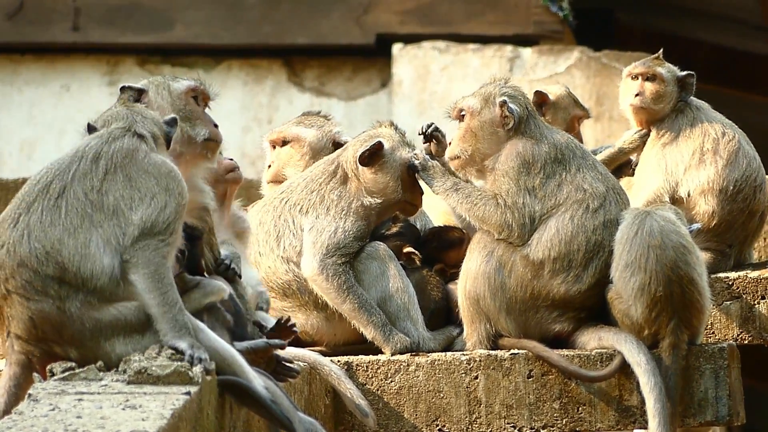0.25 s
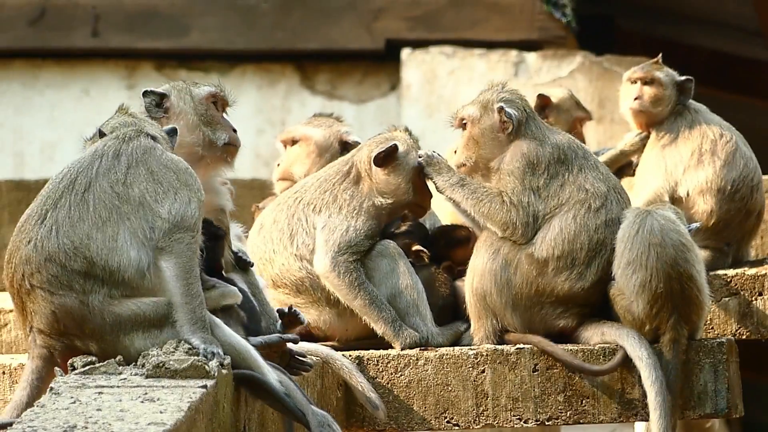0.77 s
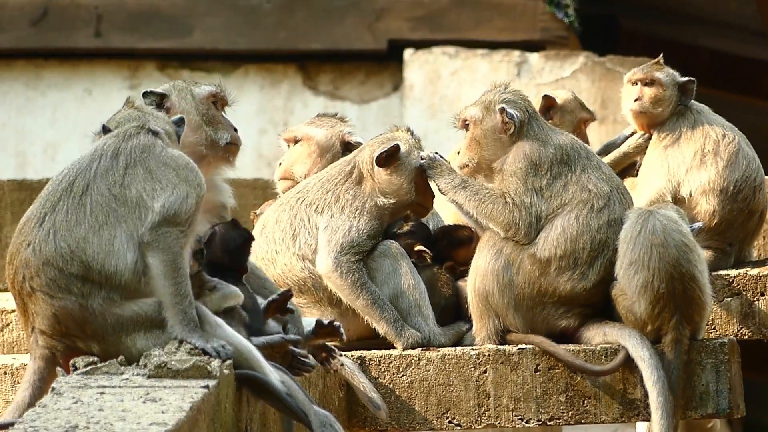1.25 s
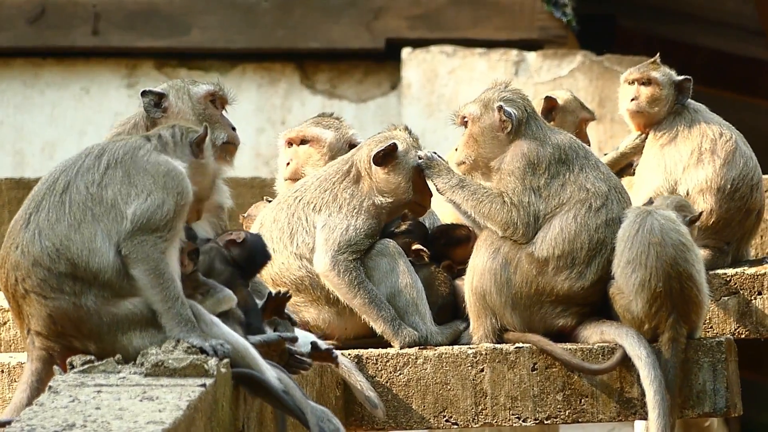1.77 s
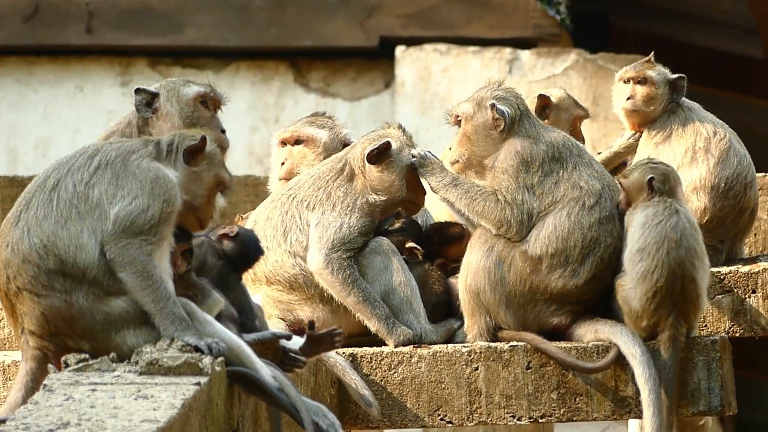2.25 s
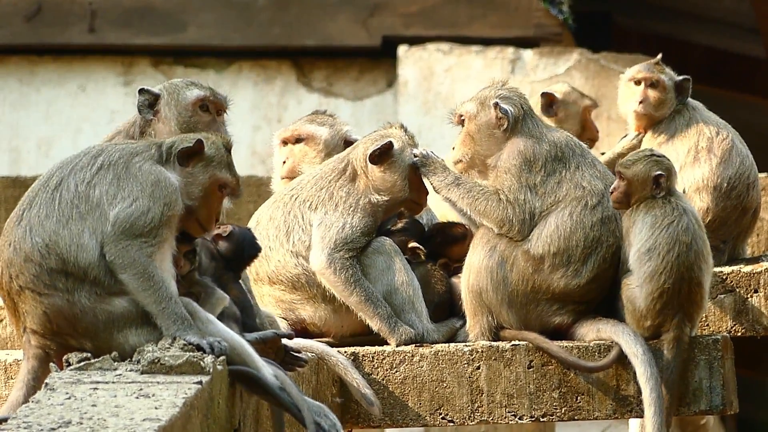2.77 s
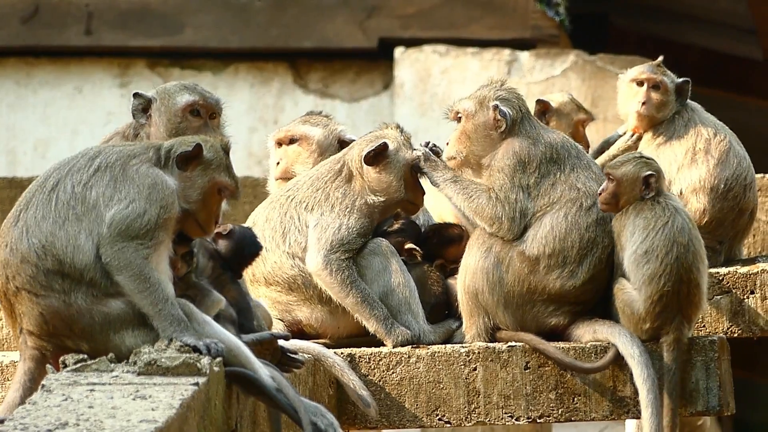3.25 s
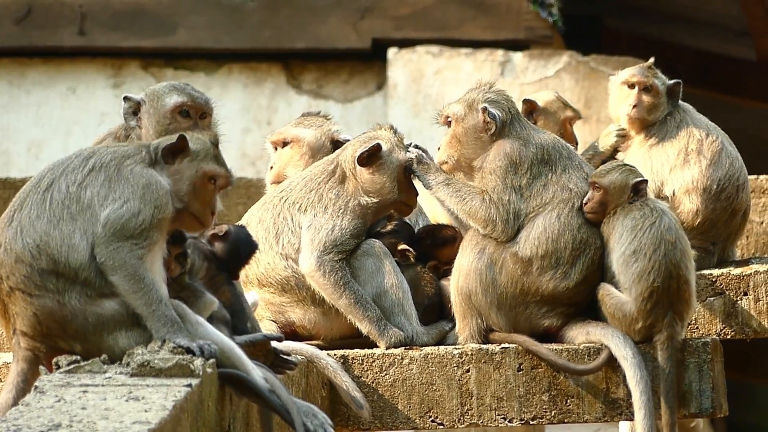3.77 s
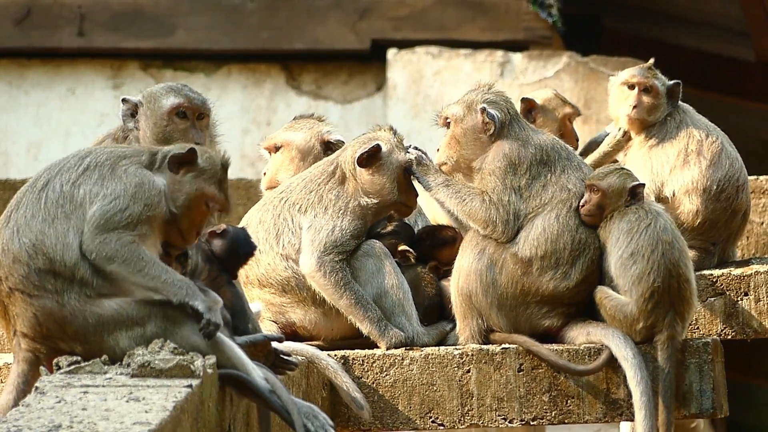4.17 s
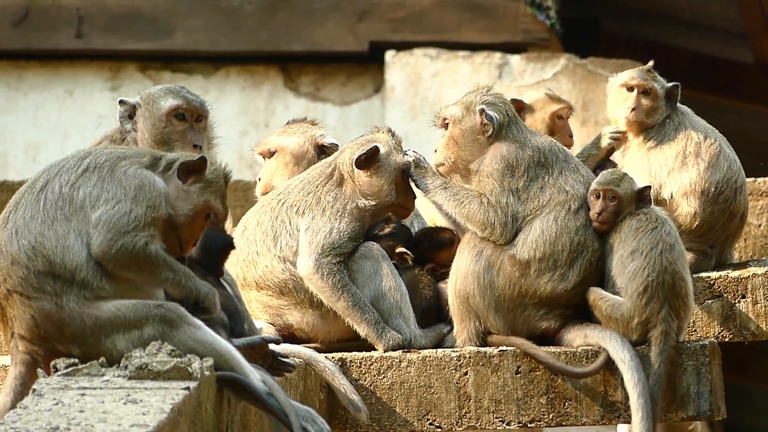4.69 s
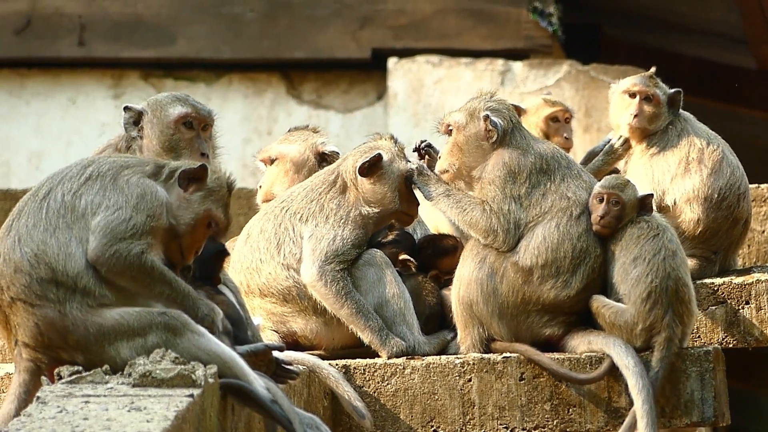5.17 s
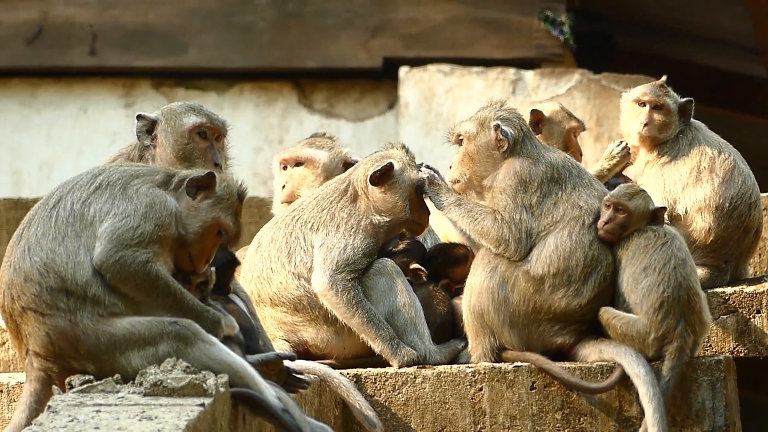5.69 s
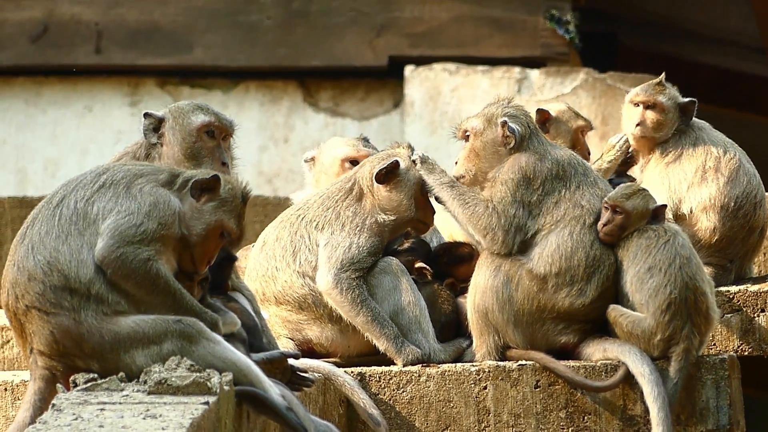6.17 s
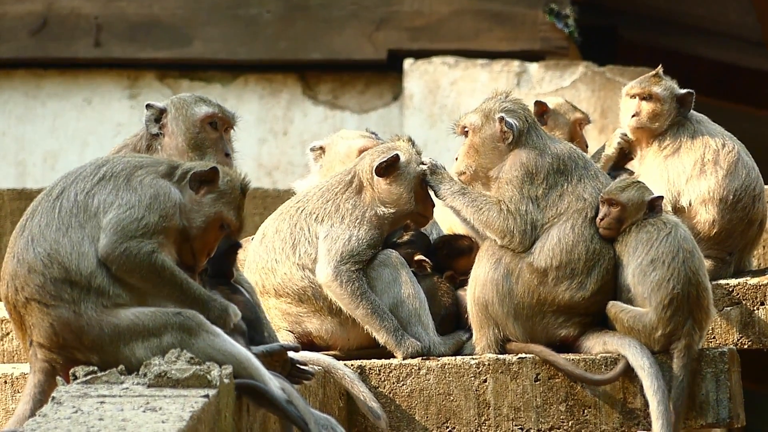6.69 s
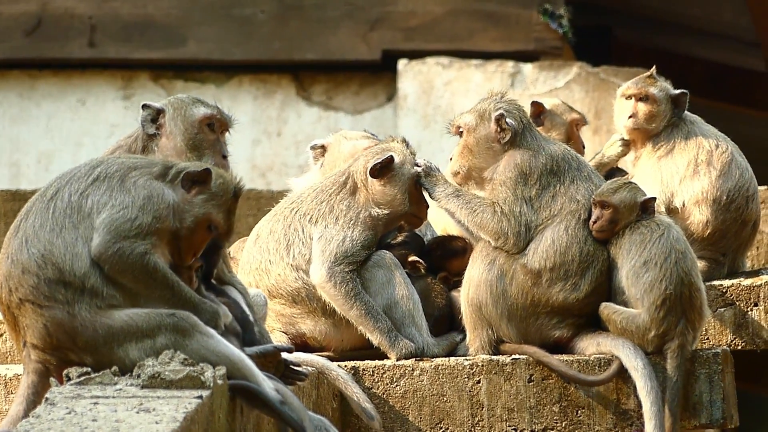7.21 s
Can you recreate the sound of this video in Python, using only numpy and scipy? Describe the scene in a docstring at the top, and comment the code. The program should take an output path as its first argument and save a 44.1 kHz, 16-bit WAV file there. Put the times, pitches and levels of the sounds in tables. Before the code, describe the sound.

Unbroken shrill insect chorus with leafy hiss and a faint high cricket throb; tiny dull knocks, a short rustle and barely audible far bird hoots.

```python
"""A dense cicada drone outdoors, with leaf hiss, low distant rumble and a bush cricket throbbing in the far treble.
Soft taps, a short rustle and faint hoots of a far bird pass under it; early on the level dips briefly.
Cicadas are random clicks ringing body resonances; hiss, rumble, cricket and rustle are shaped noise,
the last two under soft swells; taps are decaying sines, hoots are sines gliding in pitch."""
import sys
import numpy as np
from scipy import signal
from scipy.fft import rfft, irfft, next_fast_len
from scipy.io import wavfile
from scipy.ndimage import uniform_filter1d

SR = 44100
rng = np.random.default_rng(int(sys.argv[2]) if len(sys.argv) > 2 else 0)


def to_wav(s):
    """Save 16-bit WAV."""
    ch = np.atleast_2d(s).T  # columns
    pcm = np.round(np.clip(ch, -1, 1) * 32767)  # PCM
    wavfile.write(sys.argv[1], SR, pcm.astype(np.int16))


N = 328525  # samples

# Cicada body resonances. Each row: centre in Hz, width in Hz (6 dB down), relative level in dB,
# left-right likeness 0-1, left minus right in dB.
BODY_RESONANCES = [(1783, 370, -9, 0.74, -1.7), (3482, 592, -0.5, .9, -1.5), (3150, 264, -7.5, 0.77, -2),
                   (3830, 360, -7.5, 0.72, 0), (4276, 510, -11, 0.9, -3), (5100, 900, -9.5, 0.85, -1.2),
                   (5670, 1270, -13.5, 0.92, -1), (6680, 1380, -15.5, 0.91, -0.3)]
# Hiss of leaves and far insects. Each row: frequency in Hz, relative density in dB per Hz.
HISS_COLOUR = [(900, -29.5), (1400, -4), (2500, -3.5), (7800, -1.5), (10000, -1.5), (12000, -4),
               (14000, -10.5), (15700, -22)]
# Hiss, left against right. Each row: frequency in Hz, likeness 0-1.
HISS_LIKENESS = [(1500, 0), (7000, 0.66), (10000, 0.68), (13500, 0.34), (15700, 0.2)]
# Hiss balance. Each row: frequency in Hz, left minus right in dB.
HISS_BALANCE_DB = [(2000, -1.5), (8000, -1), (11000, -1), (15000, -3.5)]
# Distant rumble. Each row: frequency in Hz, relative density in dB per Hz.
RUMBLE_COLOUR = [(20, -29), (55, -6.5), (75, -6.5), (112, 1), (135, 0.5), (155, 0.5), (200, -4), (420, -4),
                 (630, -8), (820, -6.5), (1100, -11.5), (2500, -41)]
# Rumble, left against right. Each row: frequency in Hz, likeness 0-1.
RUMBLE_LIKENESS = [(30, .55), (90, .8), (170, .55), (350, .33), (800, .25), (1200, .3)]
# Phase lead of the rumble's shared part on the right. Each row: frequency in Hz, lead in radians.
RUMBLE_LEAD_RAD = [(60, 1.8), (250, 2.1), (600, 1.4), (1200, .4)]
# Rumble balance. Each row: frequency in Hz, left minus right in dB.
RUMBLE_BALANCE_DB = [(30, 1), (80, 3), (200, 0), (1000, -0.5)]
# Slow swell and retreat of the rumble. Each row: time in seconds, level against RUMBLE_DB in dB.
RUMBLE_SWELL_DB = [(0, 0), (4, -0.5), (5.3, 1.4), (6, -1.3), (7.45, -0.5)]
# Bush cricket rasp. Each row: frequency in Hz, relative density in dB per Hz.
CRICKET_COLOUR = [(6500, -22), (8500, -12), (11000, 5), (12500, 7), (14000, -1), (15700, 1)]
# Bush cricket phrases. Each row: middle of first throb in seconds, length in seconds, throbs per second,
# quickening in throbs per second squared, mean throb peak level in dB.
CRICKET_PHRASES = [(.122, 2.7, 7.12, .33, -58.5), (2.96, 1., 7.4, 0., -60.5), (4.11, 1.85, 8.2, 0., -60),
                   (6.057, .75, 7.3, 0., -59.5), (7.04, .4, 6.1, 0., -61)]
# Level of drone, hiss, rumble and cricket together. Each row: time in seconds, level in dB.
LOUDNESS_DB = [(0, 0), (.31, 0.5), (.37, -2), (1.04, -1.5), (1.22, -0.1), (1.5, .3), (1.7, -0.6), (2.6, 0),
               (7.45, 0)]
# Soft taps. Each row: start in seconds, level before onset and decay in dB, pitch in Hz, left minus right in dB.
SOFT_TAPS = [(.556, -49, 1240, 3), (.558, -54, 650, 5), (.571, -46.5, 323, 0), (2.606, -50.5, 790, -6),
             (5.162, -51, 503, -5), (6.781, -50, 480, -1)]
# Rustle strokes. Each row: middle in seconds, length in seconds, peak level in dB.
RUSTLE_STROKES = [(4.53, .1, -59), (4.6, 0.19, -53.5), (4.71, 0.13, -59)]
# Rustle. Each row: frequency in Hz, relative density in dB per Hz.
RUSTLE_TINT = [(100, -20), (400, 1), (750, -1), (1200, -10), (6000, -18), (9000, -0.5), (13000, -8),
               (15700, -21)]
# Far bird. Each row: start in seconds, length in seconds, lowest pitch in Hz, mid-note level in dB,
# left minus right in dB.
BIRD_HOOTS = [(6.296, 0.055, 986, -68, 3), (6.97, .1, 998, -75, -2), (7.175, 0.14, 985, -68, 6)]

CLICKS_PER_S = 24000  # mean rate of each click train
CHORUS_DB, HISS_UNDER_CICADAS_DB, RUMBLE_DB = -39.5, -11.5, -63
WAVER_DB, WAVER_S = 0.34, 0.062  # rms depth, span of each smoothing pass
THROB_S, THROB_SPREAD_DB = 0.094, 1.4
NOTCH_HZ, NOTCH_Q, EDGE_HZ = 7497, 60.0, 15682


def gain_of(db):
    """Amplitude ratio of a level in dB."""
    return 10 ** (np.asarray(db) / 20)


def evened(x):
    """Scale to rms 1."""
    return x / np.sqrt(np.mean(x ** 2) + 1e-20)


def read(points, hz):
    """Table value at each frequency, linear in log frequency."""
    point_hz, value = np.transpose(points)
    return np.interp(np.log(hz + 1), np.log(point_hz + 1), value)


def curve(rows):
    """Table value at each sample, linear in time."""
    s, value = np.transpose(rows)
    return np.interp(np.arange(N) / SR, s, value)


def sides(balance_db):
    """Left and right gains for a level difference."""
    return gain_of([balance_db / 2, -balance_db / 2])


def add(mix, start_s, sound):
    """Add a sound into the mix in place, cut at the end."""
    part = mix[:, round(start_s * SR):][:, :sound.shape[1]]
    part += sound[:, :part.shape[1]]


def noise(colour, same, balance, lead=((1, 0),), patchy_db=1., size=1024):
    """Two-channel noise of rms 1 from random short-time spectra with drifting patches."""
    frames = 4 * N // size + 5
    hz = np.fft.rfftfreq(size, 1 / SR)
    a, b, c, d, patches = rng.standard_normal((frames, len(hz), 5)).T
    patches = uniform_filter1d(patches, size=10, axis=0)  # over frequency
    patches = evened(uniform_filter1d(patches, size=12, axis=1))  # over time
    like = np.clip(read(same, hz), 0, 1)[:, None]
    left = a + 1j * b
    shared = like * left * np.exp(1j * read(lead, hz))[:, None]
    right = shared + np.sqrt(1 - like ** 2) * (c + 1j * d)
    spectra = np.array([left, right]) * sides(read(balance, hz))[:, :, None]
    spectra *= gain_of(read(colour, hz)[:, None] + patchy_db * patches)
    sound = signal.istft(spectra, nperseg=size, noverlap=3 * size // 4)[1]
    return evened(sound[:, :N])


def swells(rows):
    """Level shape of soft rises and falls, from rows of middle in s, length in s, peak in dB."""
    out = np.zeros((1, N))
    for middle_s, length_s, db in rows:
        add(out, middle_s - length_s / 2, gain_of(db) * np.hanning(round(length_s * SR))[None])
    return out


def cicadas():
    """Random clicks ring each resonance; a crowd ahead reaches both channels, crowds aside only one."""
    size = next_fast_len(N)
    hz, total = np.fft.rfftfreq(size, 1 / SR), 0
    for centre_hz, width_hz, db, same, balance_db in BODY_RESONANCES:
        draw = rng.uniform(-1, 1, (3, N))
        clicks = np.sign(draw) * (abs(draw) < CLICKS_PER_S / SR)  # the tymbal snaps in or out
        same = np.clip(same, 0, 1)
        heard = np.sqrt(same) * clicks[0] + np.sqrt(1 - same) * clicks[1:]
        ring = (1 + 2j * (hz - centre_hz) / width_hz) ** -2  # tymbal, then air sac
        total = total + rfft(heard, size) * ring * gain_of(db) * sides(balance_db)[:, None]
    radiated = 1 / np.sqrt(1 + (1290.0 / (hz + 1)) ** 12)  # a small body sends out no bass
    return evened(irfft(total * radiated, size)[:, :N])


def hiss():
    """Leaves and far insects: patchy, mostly treble noise."""
    sound = noise(HISS_COLOUR, HISS_LIKENESS, HISS_BALANCE_DB, patchy_db=1.5)
    return gain_of(HISS_UNDER_CICADAS_DB) * sound


def waver():
    """Gain of the crowd, wandering a little several times a second: twice-smoothed noise in dB."""
    span = round(WAVER_S * SR)
    drift = uniform_filter1d(rng.standard_normal(N), span)
    drift = uniform_filter1d(drift, span)
    return gain_of(WAVER_DB * evened(drift))


def rumble():
    """Low distant noise under a slow level curve, its phase turned between channels."""
    sound = noise(RUMBLE_COLOUR, RUMBLE_LIKENESS, RUMBLE_BALANCE_DB, RUMBLE_LEAD_RAD,
                  patchy_db=1.6, size=4096)
    return gain_of(RUMBLE_DB + curve(RUMBLE_SWELL_DB)) * sound


def cricket():
    """Each throb is a soft swell of high rasping noise, a little to the right, of random strength."""
    throbs, k = [], np.arange(40)
    for first_s, length_s, rate, quickening, db in CRICKET_PHRASES:
        # time at which a steadily quickening rate has counted k throbs
        after_s = 2 * k / (rate + np.sqrt(abs(rate ** 2 + 2 * quickening * k)))
        strength_db = db + THROB_SPREAD_DB * rng.standard_normal(len(k))
        for s, throb_db in zip(after_s, strength_db):
            if s < length_s:
                throbs.append((first_s + s, THROB_S, throb_db))
    return swells(throbs) * noise(CRICKET_COLOUR, [(1, .3)], [(1, -3.5)], patchy_db=.5)


def taps():
    """Dull knocks: sines with a quick onset and an exponential decay."""
    out, t = np.zeros((2, N)), np.arange(0, .04, 1 / SR)
    for start_s, db, hz, balance_db in SOFT_TAPS:
        decay = gain_of(db - 60 * t / 0.021)  # 60 dB in 21 ms
        onset = 1 - np.exp(-t / 0.00079)
        knock = np.sin(2 * np.pi * hz * t) * decay * onset
        add(out, start_s, sides(balance_db)[:, None] * knock)
    return out


def rustle():
    """Overlapping soft strokes of broadband noise."""
    return swells(RUSTLE_STROKES) * noise(RUSTLE_TINT, [(1, 0.7)], [(1, -1.1)], patchy_db=0.0)


def hoots():
    """Pure notes that sag in pitch to the middle, climb again and fade throughout."""
    out = np.zeros((2, N))
    for start_s, length_s, hz, db, balance_db in BIRD_HOOTS:
        u = np.linspace(-1, 1, round(length_s * SR))
        turns = np.cumsum(hz * (1 + .035 * u ** 2)) / SR
        tone = np.sqrt(2) * np.sin(2 * np.pi * turns)
        note = tone * signal.windows.tukey(len(u), .7) * gain_of(-2.5 * u)
        add(out, start_s, gain_of(db) * sides(balance_db)[:, None] * note)
    return out


def scene():
    """Drone, rumble and cricket share the level dip; rustle, hoots and taps do not."""
    leaf_hiss = hiss()
    chorus = gain_of(CHORUS_DB) * waver() * (cicadas() + leaf_hiss)
    low = rumble()
    brush = rustle()
    return gain_of(curve(LOUDNESS_DB)) * (chorus + low + cricket()) + brush + hoots() + taps()


def record(dry):
    """A narrow, partial notch in the treble, then a steep low-pass band limit."""
    notch = signal.iirnotch(NOTCH_HZ, NOTCH_Q, SR)
    notched = .7 * signal.lfilter(*notch, dry) + 0.31 * dry
    low_pass = signal.firwin(2047, EDGE_HZ, window=("kaiser", 9), fs=SR)
    return signal.oaconvolve(notched, low_pass[None], "same")


dry = scene()
out = record(dry)
to_wav(out)
```